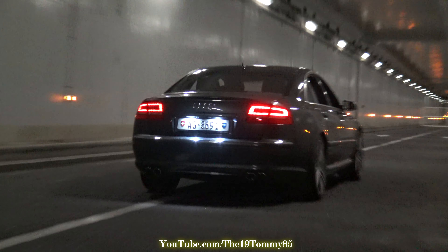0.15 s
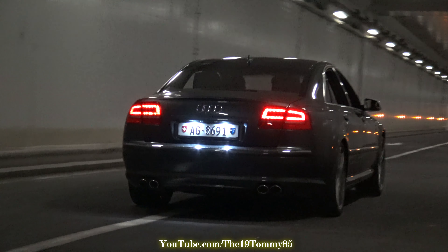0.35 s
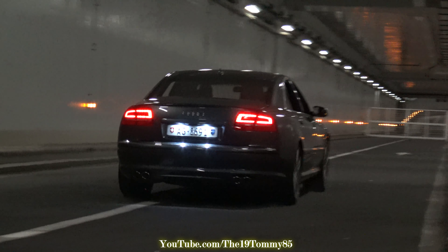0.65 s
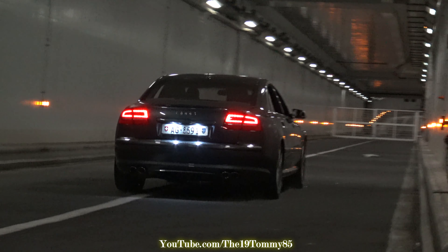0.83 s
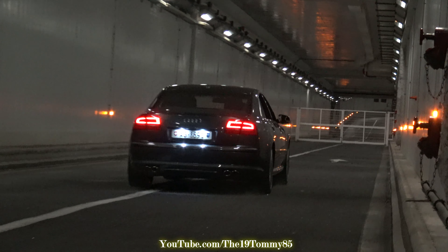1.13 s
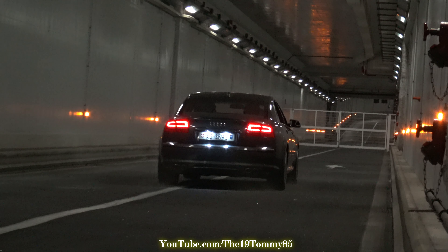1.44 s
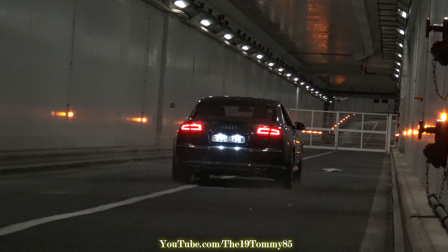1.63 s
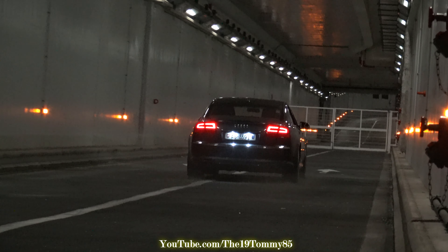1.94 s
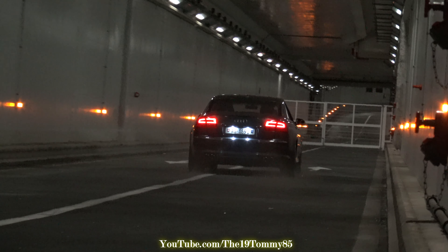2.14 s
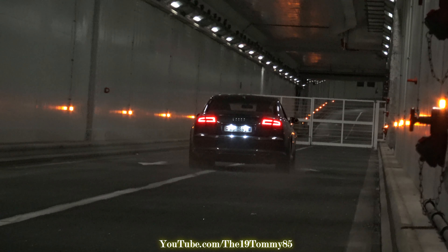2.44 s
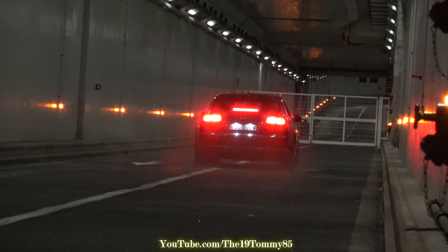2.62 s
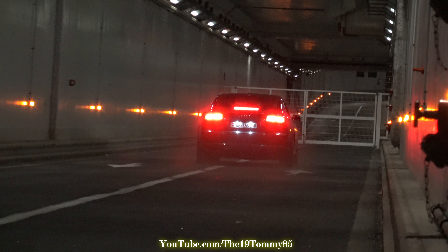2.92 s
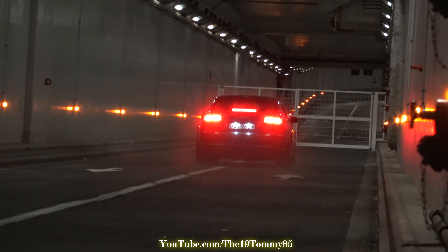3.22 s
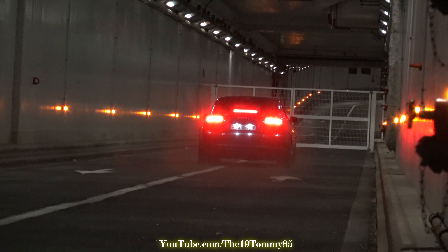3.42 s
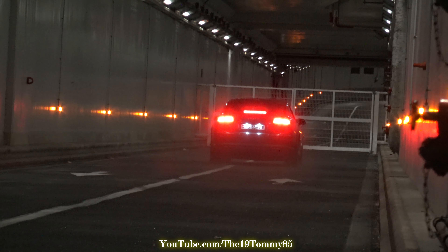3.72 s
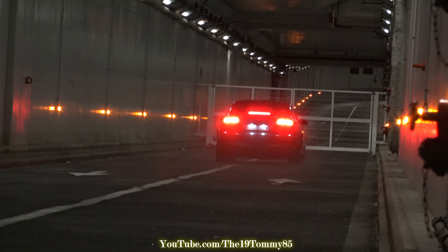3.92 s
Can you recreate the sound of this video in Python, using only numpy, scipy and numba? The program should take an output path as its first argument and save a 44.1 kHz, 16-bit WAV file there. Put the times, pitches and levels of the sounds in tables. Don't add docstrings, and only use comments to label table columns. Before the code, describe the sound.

A powerful car engine roars upward in a concrete tunnel, breaks for a gear change, returns lower, then sinks into a ringing hum as it drives off.

```python
import sys
import numpy as np
from scipy import signal
from scipy.fft import rfft, irfft
from scipy.io import wavfile
from scipy.ndimage import uniform_filter1d
from numba import njit

SR = 44100
rng = np.random.default_rng(int(sys.argv[2]) if len(sys.argv) > 2 else 0)


def amplitude_ratio(level_db):
    exponent = np.asarray(level_db, float) / 20
    return 10 ** exponent


def unload_wav(signal):
    wavfile.write(
        sys.argv[1],
        SR,
        np.round(np.clip(np.atleast_2d(signal).T, -1, 1) * 32767).astype(np.int16),
    )


N = 179158

# f/Hz, density/dB
DRONE_SPECTRUM = [(15, -40), (25, -20), (96, -11.5), (146, -6.5), (236, -11), (318, -1.5), (345, -9.5),
                  (389, -4.5), (475, -11), (515, -9.5), (849, -8.5), (1680, -18), (3000, -31),
                  (3900, -33.5), (6600, -120)]
DRONE_DB = -23.5
# start t/s, end t/s, f/Hz, level/dB
TUNNEL_MODES = [(2.4, 2.8, 346.3, -31.5), (2.5, 2.75, 892, -39), (2.55, 2.8, 134, -33),
                (2.85, 3.15, 324.6, -30.5), (3.0, 3.45, 119, -38), (3.05, 3.45, 278.4, -31),
                (3.25, 3.45, 320, -42), (3.45, 3.85, 316, -35.5), (3.7, 4.1, 394, -36.5),
                (2.15, 2.42, 835, -41), (2.42, 2.78, 845, -40), (2.1, 2.55, 165.7, -33.5)]
TUNNEL_T60_S, TUNNEL_DAMP, WET_DB = 1.46, 0.37, 4

# start t/s, end t/s, f/Hz, level/dB
PAD_SQUEAKS = [
    (2.18, 2.36, 12810, -74),
    (2.29, 2.325, 9450, -62),
]
# t/s, ring peak level/dB, ring f/Hz, treble peak level/dB
STONE_TICKS = [(.0654, -12, 5300, -40), (.0988, -9, 5600, -28), (.1124, -24, 4500, -34),
               (.1317, -14, 5200, -34), (.1454, -16, 4800, -28), (.1544, -15, 3000, -35),
               (.164, -19, 4400, -28), (.1766, -11, 3500, -29), (.1874, -13, 3000, -33),
               (.196, -21, 5000, -28), (.2085, -18, 3500, -35), (.218, -25, 3000, -35),
               (.228, -26, 6000, -35), (.239, -17, 4600, -33), (.001, -14, 3500, -24),
               (.27, -24, 3500, -42), (.386, -19, 2800, -40), (1.66, -22, 6000, -24),
               (1.69, -24, 6000, -25), (2.312, -52, 7000, -51)]

# f/Hz, density/dB
GRIT_SPECTRUM = [(3530, 1.5), (6000, 3.5), (7060, 1.5), (7710, -0.5), (9940, -5.5), (12900, -6.5),
                 (15500, -18)]
# start t/s, end t/s, level/dB
SCRABBLE = [
    (1.377, 1.442, -33.5),
    (1.462, 1.698, -35.5),
]
# t/s, length/s, level/dB
ROAD_JOINTS = [
    (0.05, .1, -33),
    (0.48, .2, -20.5),
    (0.9, 0.15, -31),
    (1.3, 0.17, -28),
    (1.516, 0.19, -33),
    (1.684, 0.11, -14.5),
    (1.82, 0.21, -20.5),
    (2.104, 0.34, -30),
    (2.5, 0.17, -30.5),
]
GRIT_PER_FLOW, GRIT_DB, GRIT_FLOOR_DB = 1.24, -13.5, -63.5
CLOSE_DB, CLOSE_FADE_DB_PER_S = -42.5, 20
RUMBLE_DB, RUMBLE_FADE_DB_PER_S = -46, 1

# t/s, firing rate of one bank f/Hz, gas flow level/dB, load on clear harmonics level/dB
ENGINE_CONTROLS = [(0.0, 140.2, -23.5, 10.5), (0.18, 158.9, -27, 1), (0.3, 168.5, -27.5, 2.5),
                   (0.5, 185.7, -27, 3.5), (0.82, 215, -24, -1.5), (1.0, 229.2, -21, -1),
                   (1.15, 238.6, -20, -1), (1.35, 243.5, -22.5, -2.5), (1.44, 231.2, -19.5, -11),
                   (1.66, 217, -16, -5), (1.7, 165.9, -21, -6), (1.85, 161.5, -21.5, -4.5),
                   (2.02, 165.7, -26, 3), (2.16, 170, -35, -5.5), (2.45, 165.1, -42, -5),
                   (2.7, 167, -42.5, -8), (3.1, 157.3, -44.5, 2), (4.06, 135.3, -46, 9)]
CYLINDER_DB = [-3, 6, -3.5, -7.5, -0.5, 1.5, 1.5, 6.5, -24, -0.5]
CYLINDER_LAG = [0.0013, 0.1066, -0.0286, 0.119, 0.0295, 0.0822, -0.0364, 0.1315, 0.1, 0.0793]
# f/Hz, width/Hz, level/dB
PIPE_RESONANCES = [(170, 87, -9.5), (348, 69, -5.5), (492, 63, 1), (583, 84, -0.5), (848.4, 83.4, 2.5),
                   (1154, 116, -0.5), (1298, 172, -3.5), (1910, 410, -9.5)]
# f/Hz, width/Hz, level/dB
TAILPIPE = [(86.6, 27, -6), (151.6, 33, -10), (193, 38, 3.5), (337, 60, -4.5), (458, 38, -0.5),
            (488, 21, -6), (555, 38, -2), (606, 77, 0.8), (788, 34, 6.5), (847, 124, 8.5), (947, 37, 4),
            (1174, 78, 4.5), (1333.4, 83, 8), (1411.4, 24, 7.5)]
# multiple of the bank rate, level/dB re roar, extra loss off throttle/dB
CLEAR_HARMONICS = [(1, -15, -16.5), (2, -2, 3.5), (3, -7, 8), (4, -13.5, 20), (5, -17, 5)]
# multiple of the bank rate, level/dB re roar, shift gain/dB
LOPE_LINES = [(.4, -23, 12), (.6, -17, 14.5), (2.4, -11.5, -4), (6.6, -13.5, 0)]
# multiple of the bank rate, level/dB re roar
WEAK_LINES = [(1.4, -12.5), (2.6, -14.5), (3.4, -37), (3.6, -14.5), (3.8, -13.5), (4.6, -13.5), (5.6, -18),
              (6, -23), (7, -14), (7.6, -22.5), (8.4, -20.5)]
# f/Hz, density/dB
HISS_SPECTRUM = [(800, -57), (1300, -2), (1800, -2.5), (2400, -9.5), (2900, -8.5), (3250, -14),
                 (3530, -10.5), (4000, -14), (4500, -11), (5200, -14), (5900, -16.5), (6500, -25),
                 (9000, -45)]
SHIFT_S, SECOND_GEAR_S, LIFT_S = 1.296, 1.69, 2.01
ROAR_DB, LIFT_DROP_DB, LIFT_SINK_S, RECEDE_DB_PER_S = -9, 13, 0.24, 8
RASP_DB, ECHO_DB = 0., -11.


def level(x, db):
    return x * amplitude_ratio(db) / np.sqrt(np.mean(x ** 2))


def curves(table):
    s, *columns = np.transpose(table)
    return [np.interp(np.arange(N) / SR, s, c) for c in columns]


def between(a, b, edge):
    t = np.arange(N) / SR
    return np.clip(np.minimum(t - a, b - t) / edge + .5, 0, 1)


def colour(x, points):
    hz, db = np.transpose(points)
    bins = np.log(np.arange(1, N // 2 + 2) * SR / N)
    gain_db = np.interp(bins, np.log(hz), db, left=-90, right=-90)
    return irfft(rfft(x) * amplitude_ratio(gain_db), N)


def walk(rate):
    k = int(SR / rate)
    held = np.repeat(rng.standard_normal(N // k + 1), k)
    return 1.16 * uniform_filter1d(uniform_filter1d(held, k), k)[:N]


@njit
def svf(x, hz, width):
    y, b, l = np.empty(len(x)), 0., 0.
    g, k = np.tan(np.pi * hz / SR), width / hz
    for i in range(len(x)):
        v = (b + g * (x[i] - l)) / (1 + g * (g + k))
        b, l, y[i] = 2 * v - b, l + 2 * g * v, k * v
    return y


@njit
def walls(x, lags, gain, damp):
    line, soft, out = np.zeros((8, 8192)), np.zeros(8), np.zeros(len(x))
    for i in range(len(x)):
        total = 0.
        for k in range(8):
            soft[k] += (1 - damp) * (gain[k] * line[k, (i - lags[k]) & 8191] - soft[k])
            total += soft[k]
            out[i] += soft[k] * (1 - 2 * (k % 2))
        for k in range(8):
            line[k, i & 8191] = x[i] + soft[k] - total / 4
    return out


def echoes(x):
    lags = rng.integers(700, 3000, 8)
    lead = SR // 2
    gain = amplitude_ratio(-60 * lags / SR / TUNNEL_T60_S)
    wet = walls(np.r_[x[lead:0:-1], x], lags, gain, TUNNEL_DAMP)[lead:]
    return wet * np.std(x) / np.std(wet)


def tunnel(x):
    return x + amplitude_ratio(WET_DB) * echoes(x)


def swells(table, width):
    t = np.arange(N) / SR
    out = np.zeros(N)
    for a, b, hz, db in table:
        arch = np.sqrt(np.clip((t - a) * (b - t), 0, 1)) * 2 / (b - a)
        out += amplitude_ratio(db) * arch * level(svf(rng.standard_normal(N), float(hz), width), 0)
    return out


def drone():
    hum = colour(rng.standard_normal(N) * amplitude_ratio(1.3 * walk(2.82)), DRONE_SPECTRUM)
    return level(hum, DRONE_DB - 4.5) + swells(TUNNEL_MODES, 4.1)


def brakes():
    return swells(PAD_SQUEAKS, 250.)


def stones():
    out, t = np.zeros(N), np.arange(SR // 50) / SR
    for s, ring_db, hz, treble_db in STONE_TICKS:
        knock = rng.standard_normal((2, len(t))) * np.exp(-t / .0011)
        ring = svf(svf(knock[0], float(hz), 2400.0), float(hz), 2400.0)
        spit = svf(knock[1], 12000.0, 7000.)
        i = int(s * SR)
        out[i:i + len(t)] += amplitude_ratio(ring_db) * ring / np.abs(ring).max()
        out[i:i + len(t)] += amplitude_ratio(treble_db) * spit / np.abs(spit).max()
    return out


def tyres(flicker):
    t = np.arange(N) / SR
    flow_db = curves(ENGINE_CONTROLS)[1]
    scrabble = sum(amplitude_ratio(db) * between(a, b, 0.027) for a, b, db in SCRABBLE)
    close = amplitude_ratio(CLOSE_DB - CLOSE_FADE_DB_PER_S * t)
    grit_gain = amplitude_ratio(GRIT_DB + GRIT_PER_FLOW * flow_db) + amplitude_ratio(GRIT_FLOOR_DB) + close + scrabble

    grain_db = 3.1 * np.minimum(rng.exponential(size=N), 7.5)
    grains = flicker * rng.standard_normal(N) * amplitude_ratio(grain_db)
    bright = level(colour(grains, GRIT_SPECTRUM), 0.31)
    dull = level(svf(bright, 6100.0, 6500.0), 0)
    near = np.clip((20 * np.log10(grit_gain) + 67) / 28, .2, 1)
    grit = near * bright + (1 - near) * dull

    bumps = sum(amplitude_ratio(db) * np.exp(-(2 * (t - s) / length) ** 2) for s, length, db in ROAD_JOINTS)
    rumble = svf(svf(rng.standard_normal(N), 107.0, 81.0), 66.0, 100.0)
    rumble_gain = amplitude_ratio(RUMBLE_DB - RUMBLE_FADE_DB_PER_S * t) + bumps
    return grit_gain * grit + rumble_gain * level(rumble, -4.8)


def pipe(x):
    out = np.zeros(N)
    for k, (hz, width, db) in enumerate(PIPE_RESONANCES):
        out += (-1) ** k * amplitude_ratio(db) * svf(x, float(hz), float(width))
    return out


def firings(turns, jitter):
    count = int(2 * turns[-1]) - 2
    chance = rng.standard_normal((count, 2)).T
    due = np.arange(count) / 2 + np.resize(CYLINDER_LAG, count) + jitter * chance[0]
    at = np.interp(due, turns, np.arange(N))
    size = amplitude_ratio(np.resize(CYLINDER_DB, count) + 4.26 * chance[1])
    whole, part = at.astype(int), at % 1
    pulses = np.bincount(whole, size * (1 - part), N) + np.bincount(whole + 1, size * part, N)
    return level(pulses - pulses.mean(), 0)


def tailpipe_gain(f):
    power = 0
    for centre, width, db in TAILPIPE:
        power = power + (amplitude_ratio(db) / (1 + (2 * (f - centre) / width) ** 2)) ** 2
    return np.sqrt(power)


def lines(rows, hz, tone, control):
    out = np.zeros(N)
    for k, db, shift_db in rows:
        gain = amplitude_ratio(db + shift_db * control + 1.44 * walk(9.3))
        out += gain * tailpipe_gain(k * hz) * tone(k)
    return out


def engine(flicker):
    hz, hiss_db, load_db = curves(ENGINE_CONTROLS)
    since = np.clip(np.arange(N) / SR - LIFT_S, 0, None)
    lifted = 1 - np.exp(-since / LIFT_SINK_S)
    roar_db = ROAR_DB - LIFT_DROP_DB * lifted - RECEDE_DB_PER_S * since
    turns = np.cumsum(hz) / SR

    def tone(k):
        wander = .008 * k * (k + 1) * walk(30)
        return np.sqrt(2) * np.sin(2 * np.pi * (k * turns + rng.random()) + wander)

    shifting = between(SHIFT_S, SECOND_GEAR_S, 0.058)
    lope = between(-1, SECOND_GEAR_S, .03) * lines(LOPE_LINES, hz, tone, shifting)
    clear = amplitude_ratio(roar_db) * (amplitude_ratio(load_db) * lines(CLEAR_HARMONICS, hz, tone, -lifted) + lope)
    weak = pipe(sum(amplitude_ratio(db + walk(5.14)) * tone(k) for k, db in WEAK_LINES))

    blurred, sharp = firings(turns, .11), firings(turns, .006)
    puffs = np.exp(-(2 * turns % 1) / 0.33) * rng.standard_normal(N)
    exhaust = pipe(blurred + level(sharp, -4.5) + level(puffs, -3.5))
    roar = level(tunnel(exhaust), -3.0) + weak
    roar = colour(roar, [(30, -23), (90, -24), (140, 1.0), (9000, -1.0)])

    rasp = level(.22 * sharp + echoes(sharp), RASP_DB)
    gas = rasp + flicker * rng.standard_normal(N)
    hiss = level(colour(gas, HISS_SPECTRUM), 0.64)
    return clear + amplitude_ratio(ECHO_DB) * echoes(clear) + amplitude_ratio(roar_db) * roar + amplitude_ratio(hiss_db) * hiss


def scene():
    flicker = amplitude_ratio(1.4 * walk(60))
    return (drone() + brakes() + stones() + tyres(flicker) + engine(flicker))[None]


def band_limit(x):
    return signal.sosfilt(signal.butter(12, 15650, fs=SR, output="sos"), x)


def record(dry):
    knee, room = .75, .35
    over = np.clip(np.abs(dry) - knee, 0, None)
    limited = np.sign(dry) * (np.minimum(np.abs(dry), knee) + room * np.tanh(over / room))
    return band_limit(np.clip(limited, -1, 1))


dry = scene()
out = record(dry)
unload_wav(out)
```